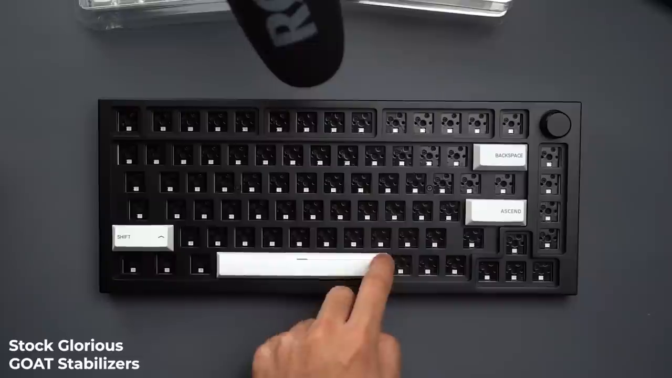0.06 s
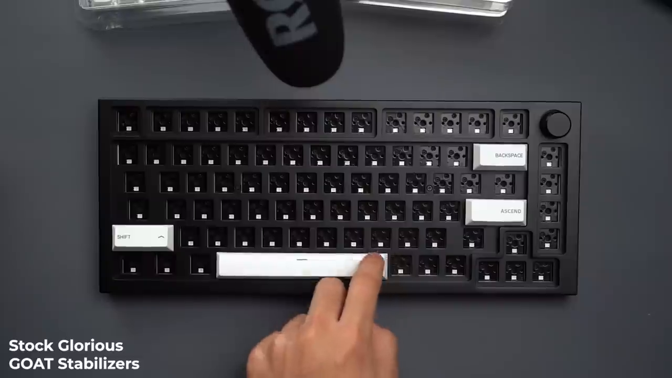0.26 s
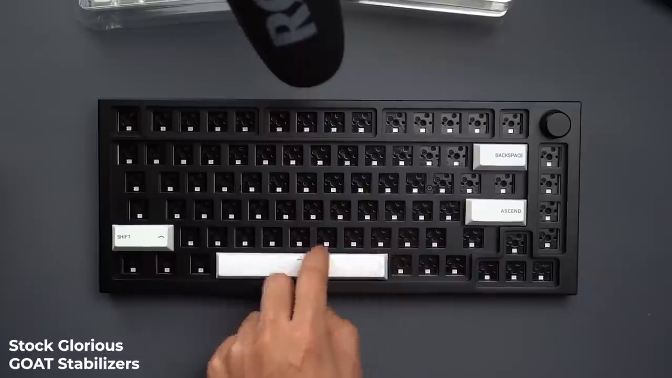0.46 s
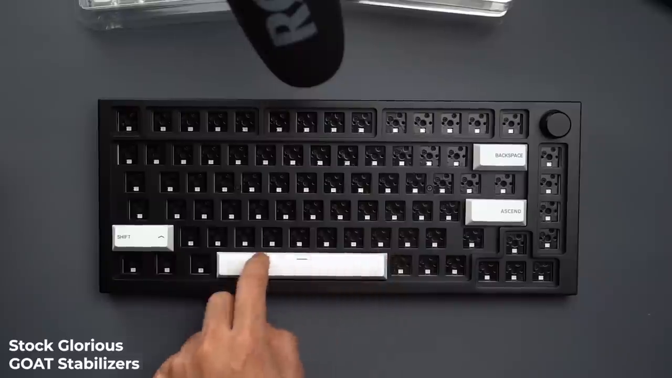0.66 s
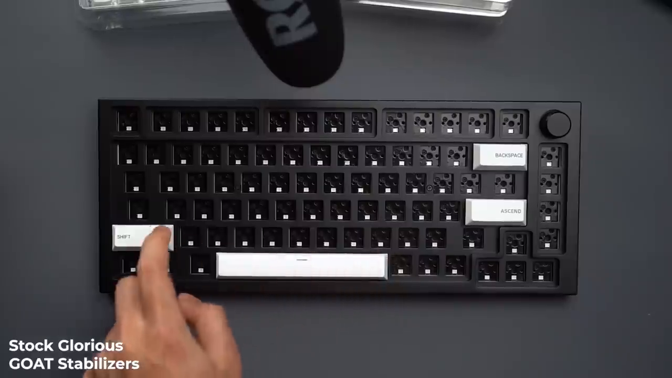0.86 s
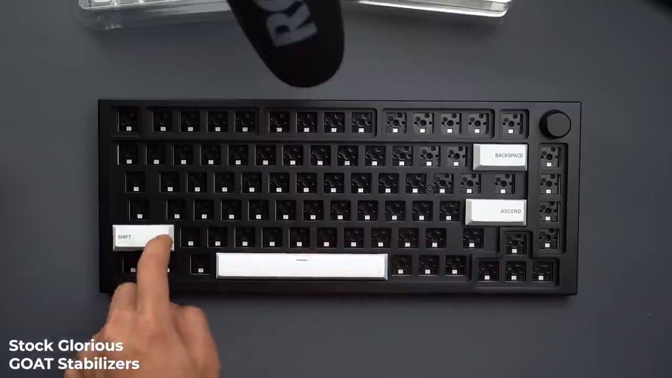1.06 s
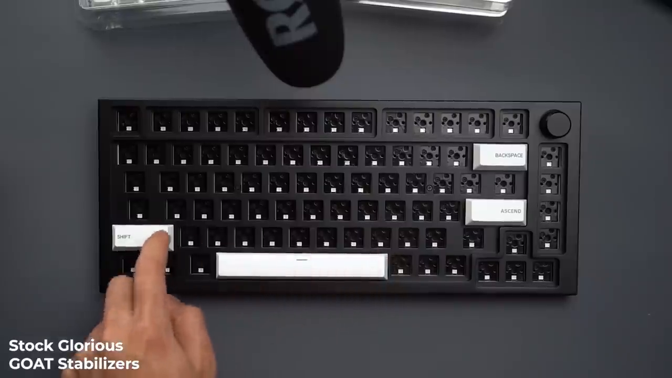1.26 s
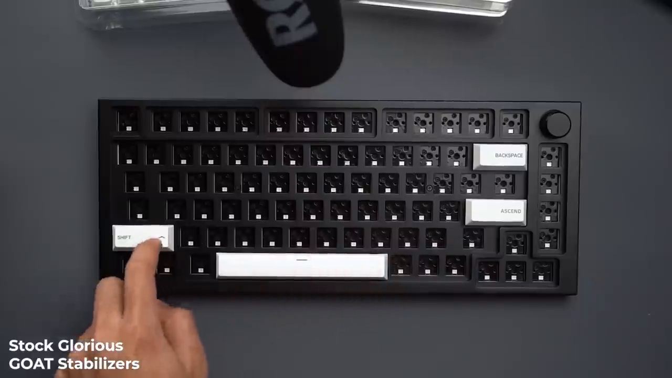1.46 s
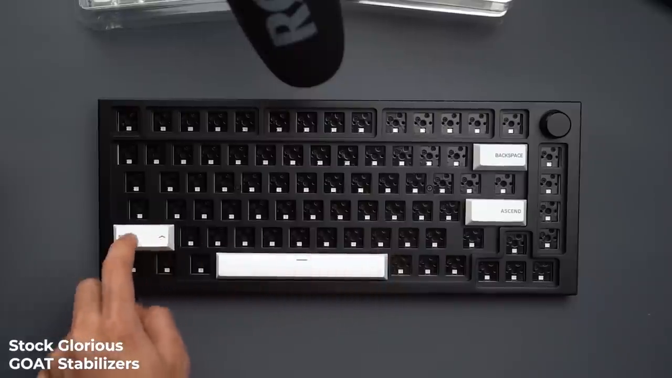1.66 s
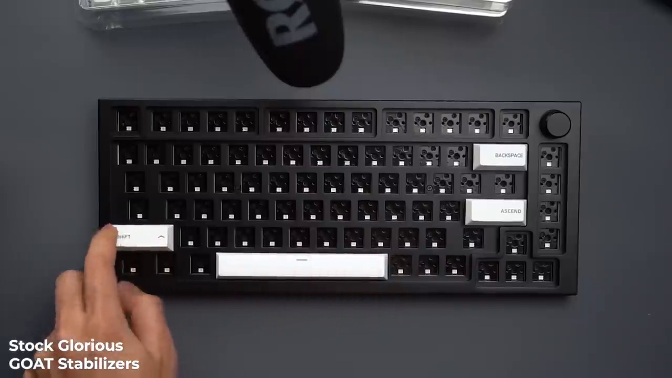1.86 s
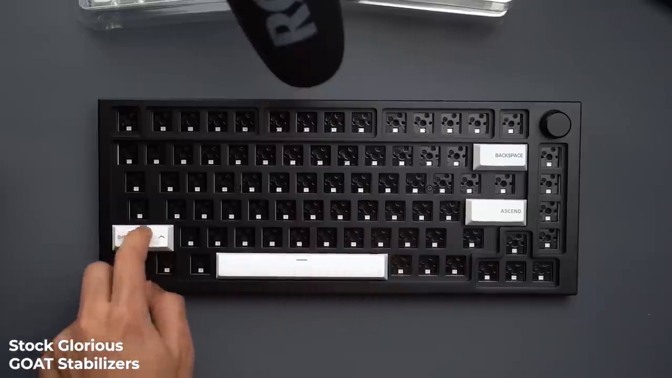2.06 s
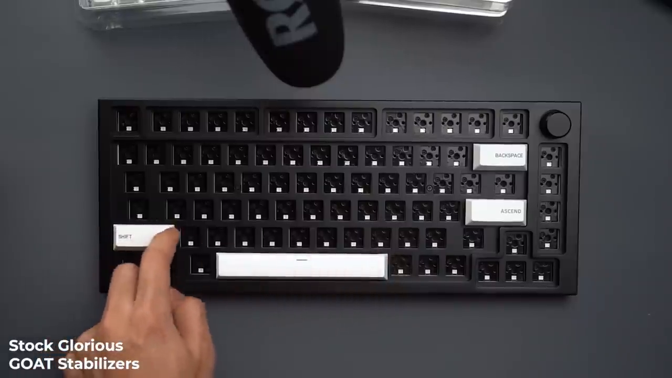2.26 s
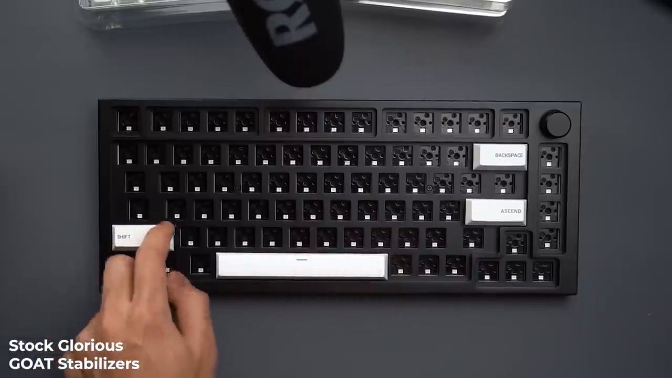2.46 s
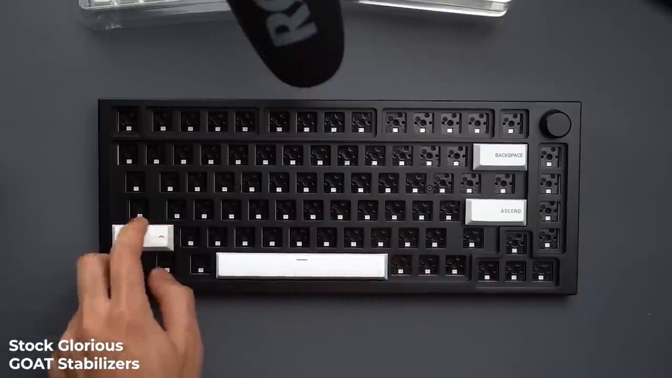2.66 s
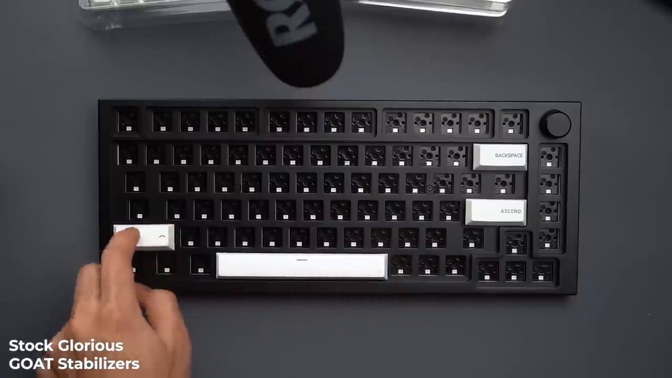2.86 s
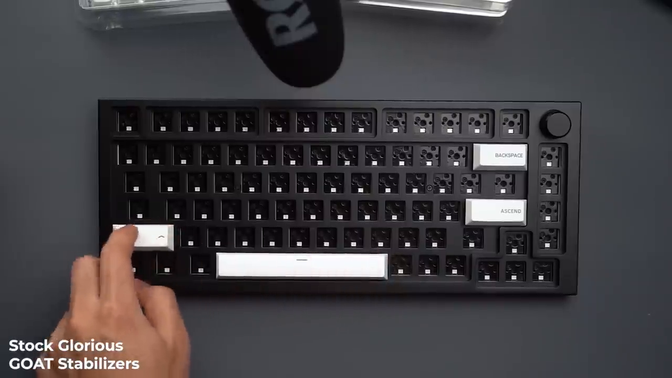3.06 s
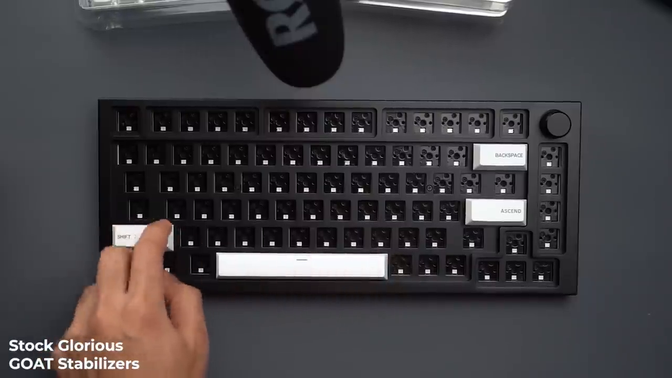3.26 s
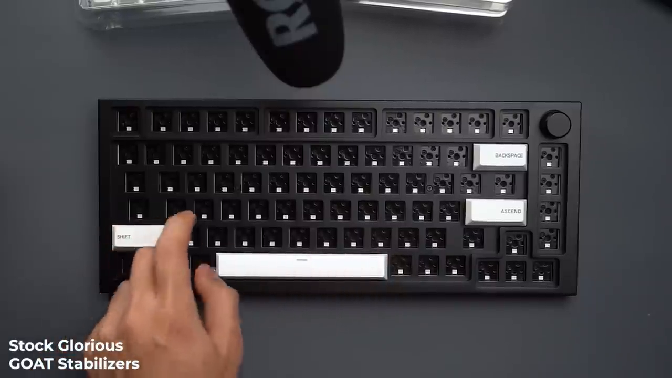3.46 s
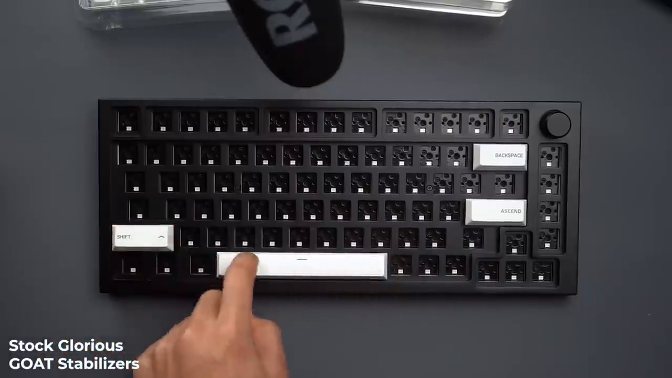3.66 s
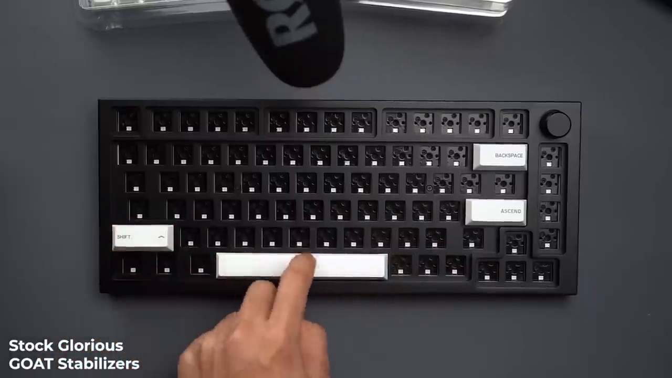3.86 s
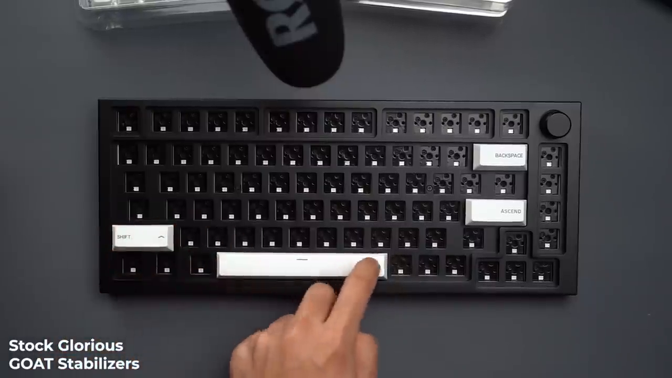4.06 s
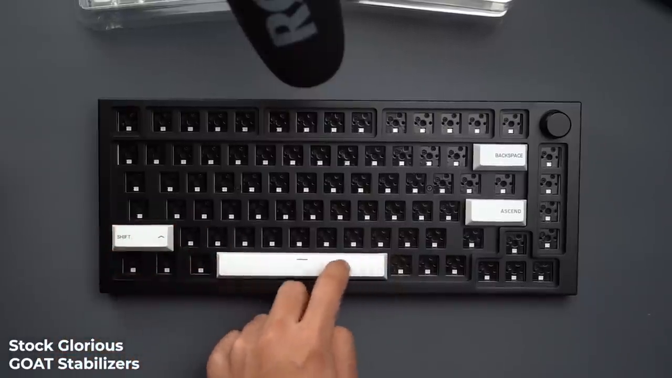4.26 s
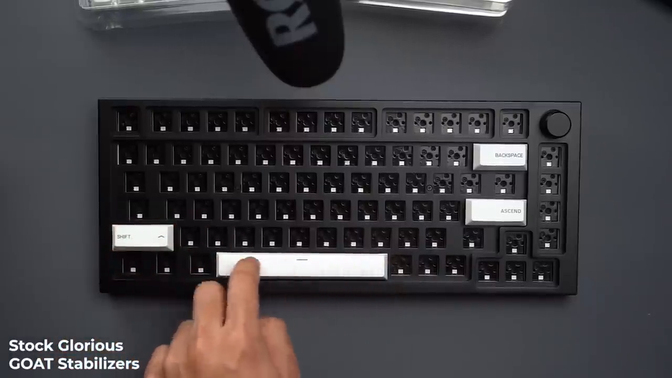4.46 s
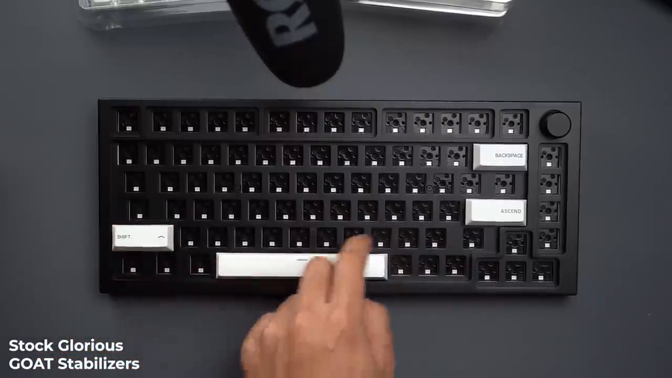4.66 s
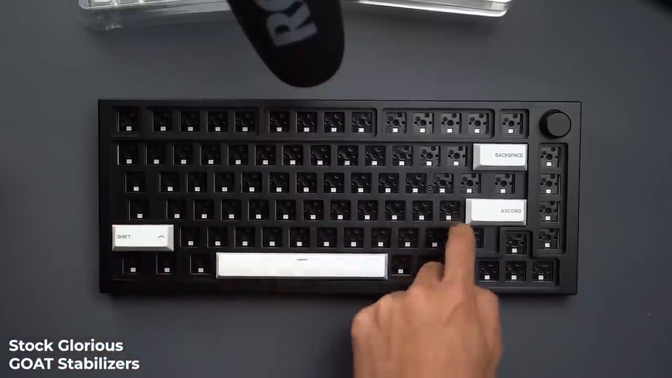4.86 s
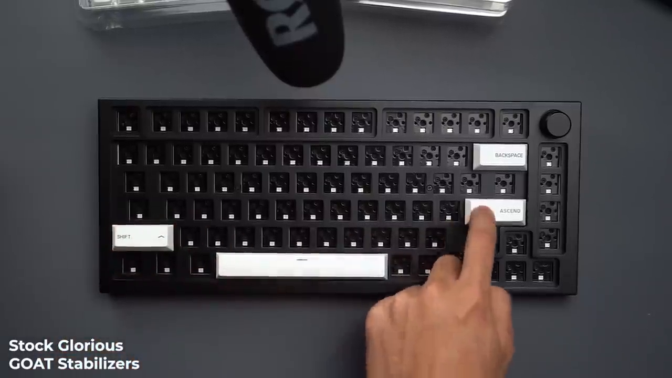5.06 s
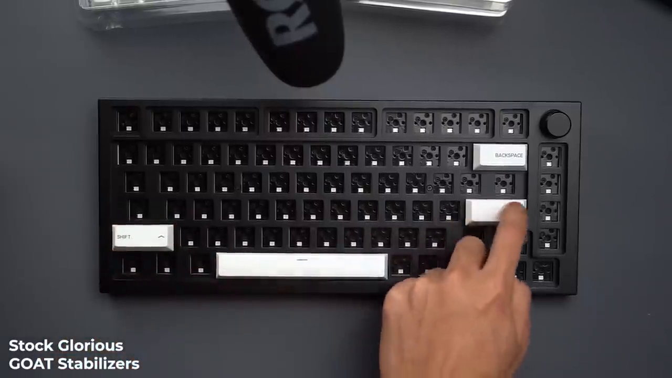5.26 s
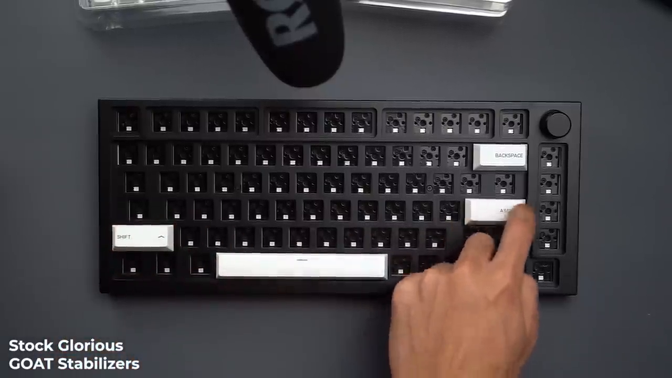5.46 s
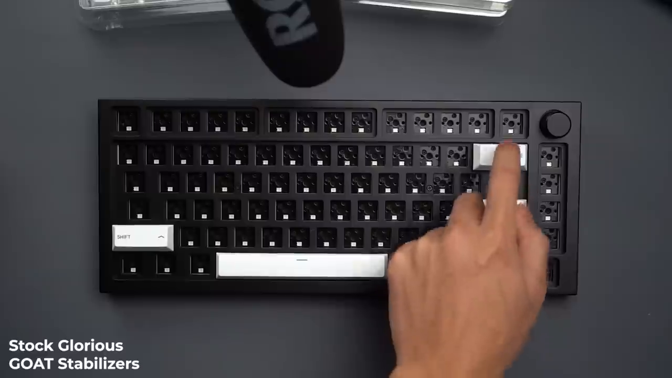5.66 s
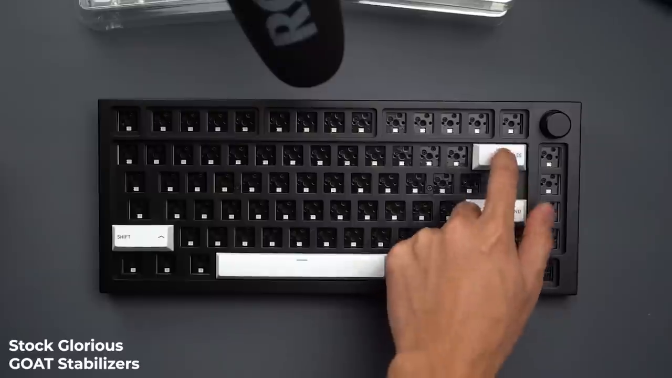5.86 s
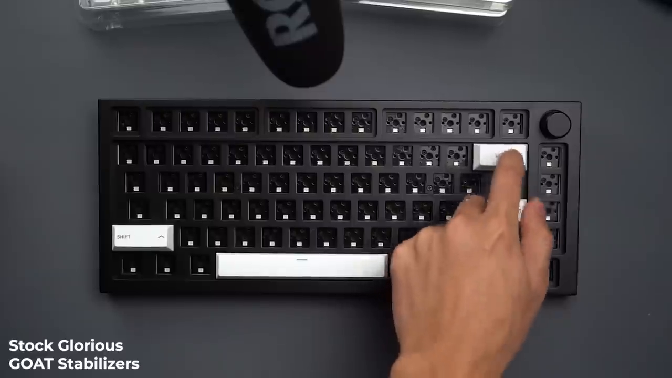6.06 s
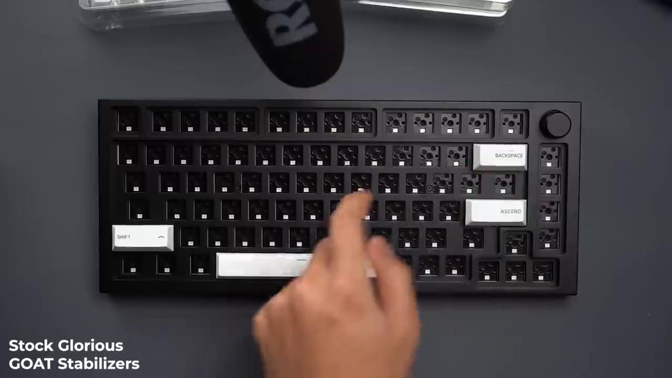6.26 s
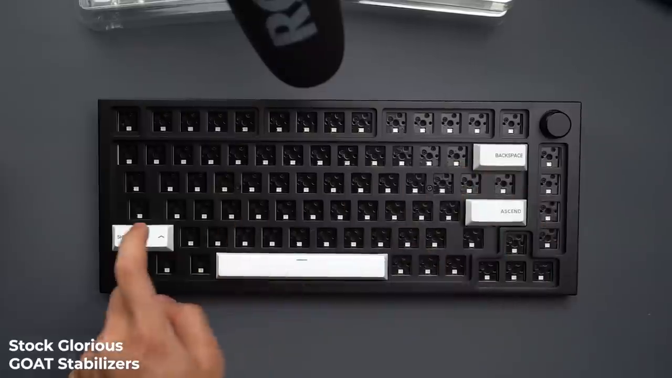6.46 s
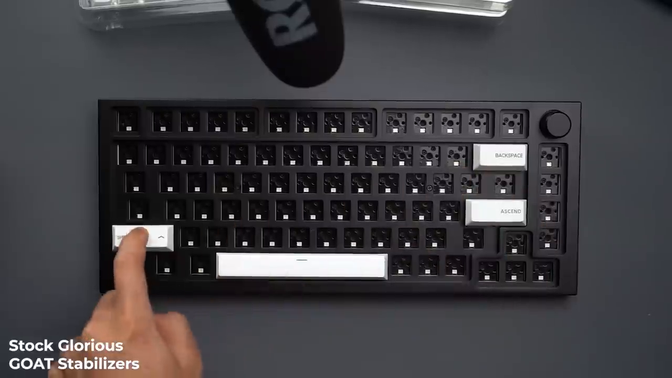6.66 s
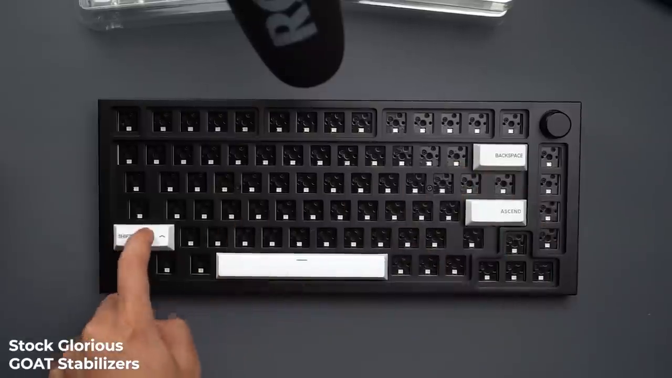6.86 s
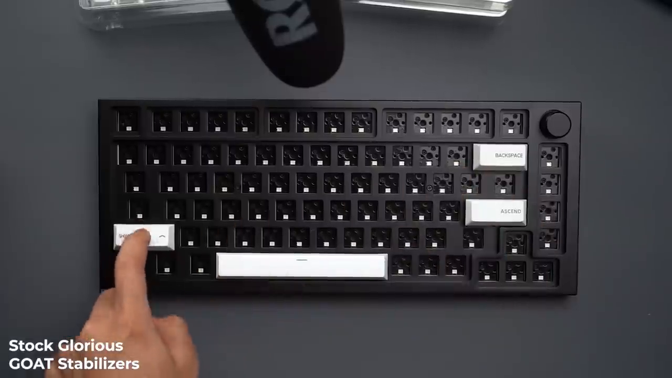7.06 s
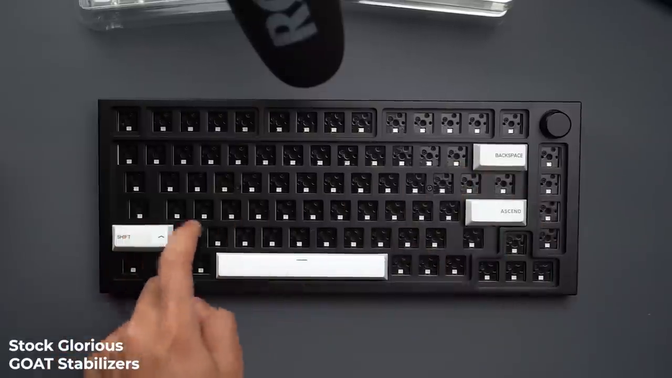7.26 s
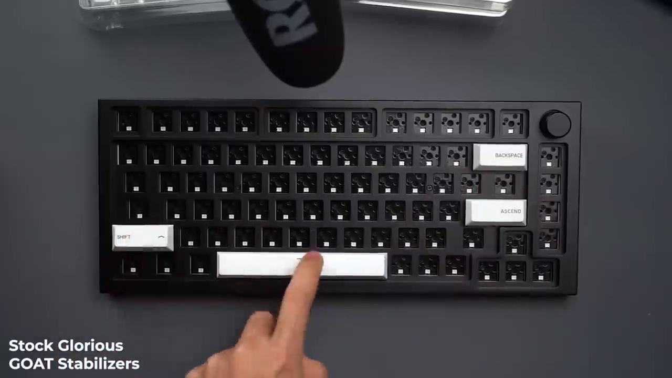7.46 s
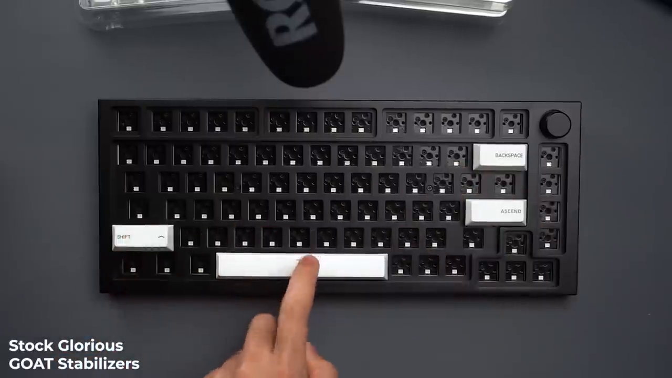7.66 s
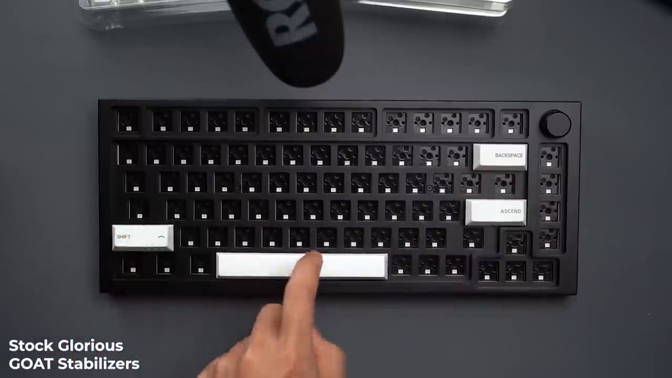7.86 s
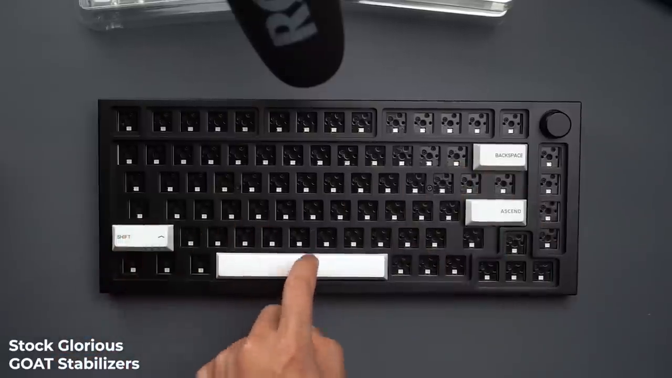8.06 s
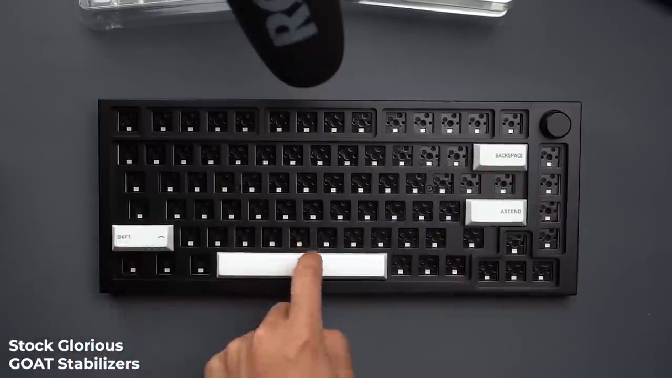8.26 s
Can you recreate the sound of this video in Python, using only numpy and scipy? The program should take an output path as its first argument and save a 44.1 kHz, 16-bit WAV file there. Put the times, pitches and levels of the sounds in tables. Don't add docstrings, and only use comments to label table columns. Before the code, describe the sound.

A finger taps the large keys of a mechanical keyboard, heard very close in a small quiet room. Five space-bar clacks, then a fast even drumming on a left key with down and up clicks, seven more bar strokes, scattered right-key clacks, three hard left-key blows and four loud spaced bar hits. Slight wire rattle, soft desk thuds and a faint fan hum.

```python
import sys
import numpy as np
from scipy import signal
from scipy.fft import rfft, irfft, next_fast_len
from scipy.io import wavfile
from scipy.ndimage import uniform_filter1d

SR = 44100
rng = np.random.default_rng(int(sys.argv[2]) if len(sys.argv) > 2 else 0)


def attenuation_scalar(level_db):
    decades = np.asarray(level_db, float) / 20
    return 10 ** decades


def pcm_store(signal):
    levels = np.round(np.clip(np.atleast_2d(signal), -1, 1) * 32767)
    wavfile.write(sys.argv[1], SR, levels.astype(np.int16).T)


N = 366030
BLOW = 4400
CUTOFF_HZ = 16300

# (time [s], case peak [dB], plate peak [dB], crack peak [dB])
BAR_BOTTOMS = [(0.1184, -18, -12, -15.5), (.28, -17.5, -11.5, -15), (0.4246, -15, -10, -14.5),
               (0.5787, -13.5, -8.5, -15.5), (0.7147, -14.5, -1, -15), (3.6988, -20, -16.5, -27),
               (3.833, -17.5, -2.5, -19.5), (3.9808, -16, -17.5, -19), (4.1302, -18, -11, -18),
               (4.279, -16.5, -10.5, -16), (4.4245, -17, -1.5, -22.5), (4.564, -18, -7, -17.5),
               (7.5268, -12, -4.5, -14), (7.765, -12, 0.5, -9), (8.0234, -11.5, 2.6, -4.5),
               (8.2734, -8.5, 1.5, -7.5)]
# (time [s], case [dB], plate [dB], crack [dB], thud on letting go [dB])
LEFT_BOTTOMS = [(1.0828, -21, -9.5, -39, -33), (1.246, -28, -20, -47, -41),
                (1.3923, -24, -15.5, -32, -26.5), (1.5461, -19, -10.5, -23, -29.5),
                (1.7023, -26.5, -19, -22, -26), (1.847, -23, -15.5, -16.5, -26.5),
                (1.9943, -20.5, -10.5, -13, -36), (2.1496, -19, -14, -17, -61),
                (2.2959, -23.5, -9, -27, -27), (2.458, -22.5, -12, -39, -26.5),
                (2.6133, -20.5, -8, -23, -31.5), (2.771, -14, -10.5, -16.5, -27.5),
                (2.9221, -23, -9.5, -16, -28.5), (3.074, -20, -5, -11, -34.5),
                (3.2224, -21.5, -7.5, -37, -37), (3.3776, -24, -11, -42, -27)]
# (time [s], case peak [dB], plate peak [dB])
LEFT_RETURNS = [(1.144, -12, -8.5), (1.3046, -15.5, -16.5), (1.456, -16.5, -18), (1.6095, -14.5, -11.5),
                (1.7597, -16, -16), (1.9073, -16, -13), (2.059, -17, -15), (2.205, -17, -18.5),
                (2.3621, -18.5, -19.5), (2.519, -15.5, -18.5), (2.6774, -15.5, -16), (2.8339, -15, -15.5),
                (2.9846, -14.5, -14.5), (3.1438, -17.5, -18), (3.2979, -18, -17.5), (3.4426, -15, -15.5),
                (6.7273, -14, -10.5), (6.9705, -9.5, -4), (7.2274, -11, -4)]
# (time [s], case peak [dB], plate peak [dB], crack peak [dB])
FULL_CLACKS = [(4.8976, -22.5, -22, -25.5), (5.0646, -19.5, -18.5, -22), (5.1448, -16, -16, -22.5),
               (5.2283, -18, -18.5, -17.5), (5.298, -18, -19.5, -27.5), (5.4357, -15, -18, -23),
               (5.5786, -15, -17.5, -20), (5.78, -15, -11.5, -14), (5.9189, -22.5, -14, -17),
               (6.0487, -12, -7.5, -11), (6.6458, -9.5, -3, -3), (6.8822, -13, -1, -3.5),
               (7.1269, -11, 0, 0)]


def rms_one(x):
    return x / np.sqrt(np.mean(x ** 2) + 1e-20)


def at_hz(points, hz, column=1):
    points = np.array(points)
    return np.interp(np.log(np.maximum(hz, 1)), np.log(points[:, 0]), points[:, column])


def coloured(white, spectrum):
    size = next_fast_len(N)
    gain = attenuation_scalar(at_hz(spectrum, np.fft.rfftfreq(size, 1 / SR)))
    return rms_one(irfft(rfft(white, size) * gain, size)[:N])


def ring(push, hz, t60):
    radius = attenuation_scalar(-60 / (t60 * SR))
    angle = 2 * np.pi * hz / SR
    return signal.lfilter([0, np.sin(angle)], [1, -2 * radius * np.cos(angle), radius * radius], push + 1e-18)


def band(x, low_hz, high_hz):
    return signal.sosfilt(signal.butter(2, [low_hz, high_hz], "band", fs=SR, output="sos"), x)


def lay(times, shapes):
    out = np.zeros(N + shapes.shape[1])
    starts = np.round(times * SR).astype(int)
    np.add.at(out, starts[:, None] + np.arange(shapes.shape[1]), shapes)
    return out[:N]


def fan_hum():
    # (frequency [Hz], density [dB per Hz])
    hum_spectrum = [(33, -25), (50, -5), (80, -11), (125, -2.5), (170, -1.5), (215, -0.5), (275, 4.5),
                    (320, -7), (500, -11), (1000, -17), (2500, -31), (3500, -31.5), (5500, -46),
                    (16400, -49)]
    return attenuation_scalar(-46.5) * coloured(rng.standard_normal(N), hum_spectrum)


def slides():
    # (time [s], length [s], level at start [dB], level at end [dB])
    long_rubs = [(0.0, 0.047, -53.5, -66), (.165, 0.036, -68, -67), (.3, 0.041, -64, -60),
                 (.455, 0.044, -56, -62.5), (.601, 0.052, -54, -64), (.746, 0.049, -55, -63),
                 (3.7, 0.0045, -34, -60), (3.793, 0.052, -69, -53), (3.835, 0.083, -50, -61.5),
                 (3.983, 0.081, -60, -62.5), (4.318, 0.058, -56, -63), (4.392, 0.036, -65, -52),
                 (4.454, 0.095, -57, -67), (4.61, 0.048, -57, -61.5), (4.883, 0.011, -55.5, -42),
                 (4.927, 0.043, -62, -49), (5.208, 0.013, -58, -64), (6.634, 0.016, -79, -55),
                 (7.603, 0.019, -51.5, -66.5), (7.854, 0.015, -55.5, -55), (8.114, 0.016, -64.5, -60)]
    # (length [s], level at start [dB], level at end [dB])
    kinds = [(BAR_BOTTOMS, (0.012, -69.5, -51.5)),
             (LEFT_BOTTOMS, (0.012, -54, -69.5)),
             (LEFT_RETURNS, (0.02, -71.5, -70.5)),
             (FULL_CLACKS, (0.0087, -60.5, -70))]
    travels = [(row[0] - travel[0], *travel) for rows, travel in kinds for row in rows]
    return travels + list(long_rubs)


def scrape():
    # (frequency [Hz], density [dB per Hz])
    scrape_colour = [(1200, 4), (3000, 2.5), (4800, -5.5), (5600, -2.5), (6800, -10.5), (8000, -8.5),
                     (8600, -6), (9600, -11.5), (11500, -5.5), (12800, -12), (14800, -8.5), (16200, -4.5)]
    t = np.arange(N) / SR
    grains = rng.standard_normal(N) * attenuation_scalar(1.5 * rng.exponential(1, N))
    grip_db = 1.2 * rms_one(uniform_filter1d(rng.standard_normal(N), size=300))
    level = np.zeros(N)
    for s, length, start_db, end_db in slides():
        inside = slice(int(s * SR), int((s + length) * SR))
        level[inside] = attenuation_scalar(np.interp(t[inside], [s, s + length], [start_db, end_db]))
    return attenuation_scalar(9.5 + grip_db) * uniform_filter1d(level, size=220) * coloured(grains, scrape_colour)


def room(x):
    # (frequency [Hz], t60 [s], level [dB])
    tail_bands = [(150, 0.14, -47.5), (530, 0.32, -12.5), (820, .3, -28), (1610, 0.35, -29.5),
                  (2800, 0.31, -31.5), (4100, 0.28, -29), (6960, 0.33, -42), (12000, 0.28, -41.5),
                  (15160, .2, -41)]
    # (frequency [Hz], level [dB])
    early_bands = [(500, -20), (1000, -10.5), (2400, -12), (4200, -11.5), (14000, -12.5)]
    # (frequency [Hz], share [0-1])
    blurred = [(700, .15), (1700, 0.4), (3000, 0.6)]
    early_s, early_t60_s = 0.0038, 0.0083
    t = np.arange(SR // 2) / SR
    paths = rng.standard_normal((2, len(t)))
    white = rng.standard_normal((2, N))
    early = attenuation_scalar(-60 * np.abs(t - early_s) / early_t60_s) * np.clip(t / early_s, 0, 1) ** 2
    edges = 60 * 2 ** np.arange(0, 8.1, .5)
    echo, tail = 0, 0
    for k, (low, high) in enumerate(zip(edges, edges[1:])):
        hz = np.sqrt(low * high)
        below, above = low / 1.2, high * 1.2
        t60 = at_hz(tail_bands, hz)
        gain = attenuation_scalar(at_hz(tail_bands, hz, column=2))
        share = np.clip(at_hz(blurred, hz), 0, 1)
        echo = echo + attenuation_scalar(at_hz(early_bands, hz)) * early * band(paths[k % 2, ::-1], low, high)
        echo = echo + gain * np.sqrt(1 - share) * attenuation_scalar(-60 * t / t60) * band(paths[k % 2], low, high)
        power = signal.lfilter([share], [1, -attenuation_scalar(-120 / (t60 * SR))], band(x, below, above) ** 2)
        tail = tail + gain * np.sqrt(power * SR / 2 / (above - below)) * band(white[k % 2], low, high)
    return attenuation_scalar(-18.5) * (signal.fftconvolve(x, echo)[:N] + tail)


def on_bar(times):
    # (start [s], end [s])
    bar_periods = [
        (0, .9),
        (3.6, 4.7),
        (7.4, 8.4),
    ]
    return np.any([(times >= a) & (times < b) for a, b in bar_periods], axis=0)


def contacts(rows, cap_db, crack_db=0.0):
    s, case_db, plate_db, *own = np.transpose(rows)
    crack = own[0] if own else plate_db + crack_db
    return np.array([s, case_db, (case_db + plate_db) / 2 + cap_db, plate_db, crack])


def all_contacts():
    # (time [s], case peak [dB], plate peak [dB])
    bar_returns = [(.0437, -43, -40), (.1982, -45, -41), (.3466, -33.5, -22), (.497, -32, -25),
                   (.734, -46, -40), (.789, -31.5, -34), (3.7184, -34, -18), (4.6572, -42, -41),
                   (7.6104, -23, -28.5), (7.8623, -25, -34.5), (8.1296, -30.5, -25.5)]
    # (time [s], case peak [dB], plate peak [dB])
    bar_touches = [(.098, -33, -17.5), (.2587, -37.5, -16.5), (.4058, -35.5, -16.5), (.6947, -36.5, -27.5),
                   (3.958, -42, -25), (4.106, -42, -19.5), (4.2577, -39, -20.5), (7.518, -31.5, -13.5),
                   (7.754, -52.5, -47.5), (8.0144, -45, -28), (8.265, -34, -21)]
    # (time [s], case peak [dB], plate peak [dB])
    key_touches = [(1.0719, -42, -10.5), (1.227, -61, -12.5), (1.374, -43, -11), (1.531, -44, -22),
                   (1.6846, -41, -20), (1.828, -37, -21.5), (1.9786, -40, -22.5), (2.1796, -55, -24.5),
                   (2.2787, -39, -15.5), (2.441, -40, -18.5), (2.6, -47, -12), (2.7614, -51, -31),
                   (2.9066, -31, -21.5), (3.059, -34, -20.5), (3.2037, -63, -39), (3.3567, -53, -17),
                   (4.8856, -35, -34), (5.0388, -51, -25), (5.7712, -44, -30), (6.039, -55, -34),
                   (6.1055, -53.5, -31), (6.6405, -25, -17), (6.8766, -37, -27), (7.1216, -36, -23),
                   (7.2153, -65, -27)]
    # (time [s], case peak [dB], plate peak [dB])
    light_ticks = [(4.9074, -33, -36), (4.936, -41, -39), (5.3571, -28, -28.5), (5.504, -30, -25),
                   (5.5227, -30, -30), (5.8443, -22.5, -30.5), (5.9844, -20.5, -19), (6.122, -20, -14.5),
                   (6.204, -35, -36)]
    return np.hstack([contacts(BAR_BOTTOMS, cap_db=-2.6),
                      contacts(bar_returns, cap_db=3.0, crack_db=-18.5),
                      contacts(bar_touches, cap_db=1.5, crack_db=-6.0),
                      contacts(LEFT_BOTTOMS, cap_db=0.4),
                      contacts(LEFT_RETURNS, cap_db=-1.0, crack_db=-4.5),
                      contacts(key_touches, cap_db=-1.0, crack_db=-3.0),
                      contacts(FULL_CLACKS, cap_db=3.5),
                      contacts(light_ticks, cap_db=-6.0, crack_db=-1.0)])


def chatter(times, case_db, plate_db, touch_ms, clack_ms, hard_ms):
    t_ms = np.arange(BLOW) / SR * 1000
    clack_soon = np.array([np.any((times > s) & (times < s + .027)) for s in times])
    touch = clack_soon & (case_db < -18.8)
    length = np.where(touch, touch_ms, np.where(plate_db > -9.5, hard_ms, clack_ms))[:, None]
    envelope = np.exp(-t_ms / length) * (1 - np.exp(-2 * t_ms / length)) ** 2
    force = rng.standard_normal((len(times), BLOW)) * envelope
    return force / np.linalg.norm(force, axis=1, keepdims=True)


def body(modes, times, force, peak_db):
    scatter_db = 2.2 * np.clip(rng.standard_normal((len(times), len(modes))), -3, 1.2)
    hard = np.clip(peak_db + 6, 0, 9)
    out = 0
    for k, (hz, t60, bar_db, key_db) in enumerate(modes):
        own = np.abs(force @ np.exp(2j * np.pi * hz / SR * np.arange(BLOW)))
        octaves = np.log2(hz / modes[2][0])
        mode_db = np.where(on_bar(times), bar_db - 4.8 * hard * abs(octaves), key_db + 2 * hard * octaves)
        gain = attenuation_scalar(mode_db + scatter_db[:, k]) / np.maximum(own, .3)
        out = out + ring(gain[:, None] * force, hz, t60)
    return out


def crowd(bands, force):
    out = 0
    for low_hz, high_hz, t60, db in bands:
        power = signal.lfilter([1], [1, -attenuation_scalar(-120 / (t60 * SR))], force ** 2 + 1e-18)
        noise = band(np.sqrt(power) * rng.standard_normal(force.shape), low_hz, high_hz)
        out = out + attenuation_scalar(db) * noise * np.sqrt(SR / 2 / (high_hz - low_hz))
    return out


def favour(times, blows):
    # (time [s], hollow [dB], cap [dB], stem [dB], snap [dB])
    tints_drummed = [(1.072, 4, 10.5, 4.5, 1.5), (1.083, 5, -2, -11, 4), (1.144, 0, 1, -0.5, 5.5),
                     (1.227, -4.0, 4, 3, 5.5), (1.246, 8, -1, -9, 5), (1.305, 6, -7, 8, -10),
                     (1.374, 1.0, 13, 3, 7), (1.392, 4, 0, -1, 4), (1.456, 7.5, -7.0, 7, -9.0),
                     (1.546, 4.5, -2, 3, 6), (1.609, 6.5, -2, 3, -2), (1.702, 7.5, -3, 10, 2),
                     (1.76, 3.5, -7, -1, -4), (1.847, 0.0, 0, 9, -1.5), (1.907, 4.5, -3.5, 3, -2),
                     (1.994, -1, 0.5, 9, 3.5), (2.059, 9, -12, -3, -8.0), (2.15, 4.5, 0, 3, -2),
                     (2.205, 2, -7, 8, -9.0), (2.279, -8.0, 11, 0, 4), (2.296, 5, 2.5, 0.5, -3.0),
                     (2.362, 7, -2, 7.5, -8.0), (2.441, -3.0, 9, 1, 1), (2.458, 0.0, 0, -2, 11),
                     (2.519, -1, 7, 7, -5), (2.6, 0.0, 7, 1, 2), (2.613, 3.5, -1, 0, 1),
                     (2.677, 4, -6, 7, -8), (2.771, 0.5, 2.5, 7, 1), (2.834, 6, -4.5, 2, -5.5),
                     (2.907, -5, 0, 0.0, -10), (2.922, -7.5, 0.5, 6, -7.5), (2.985, 4.5, -1, 1.5, -8),
                     (3.059, -9, 4, 0.5, -5), (3.074, 0, 3, 2, 0), (3.144, 6.5, -0.5, 2, -6),
                     (3.223, 6, -3, -1, 10.5), (3.298, 3, -7, 3.5, -2.0), (3.378, 7, 1.5, -3, 11),
                     (3.443, 1.5, -10, 6, -9)]
    # (time [s], hollow [dB], cap [dB], stem [dB], snap [dB])
    tints_single = [(0.118, 7, 1, -4, -1), (0.28, 4.5, 3, 2.5, -1), (0.424, 3, 1, -3, -7.0),
                    (0.579, -1.5, -0.5, -8, 0), (0.715, 3, 1, -1.5, 7.5), (3.699, -10.0, -12, -14, 7),
                    (3.833, 5, 2.5, -1, 6), (3.981, 3.5, -1, 10, 2.5), (4.13, 6.5, -3, 3.5, -1),
                    (4.279, 4.5, -9, -0.5, -3), (4.425, 2, 1.5, 0.5, 11.5), (4.564, 4, 6, -7, 3),
                    (4.898, 4, -4, 2, 1), (5.065, -7, -13, -1, -10.0), (5.145, 3.5, -14, -1.5, 3),
                    (5.228, 1, -2, -7, -2), (5.298, 4, -1.5, -8, 4), (5.436, -3, -9, -5, 5.5),
                    (5.579, 1.5, -7, -2, -3.0), (5.78, 2, -2.5, 0, -1.5), (5.844, -3, -2, 6, 14.5),
                    (5.919, 1.5, 1.5, -1.5, -2), (5.984, 7.5, 9, -6, 4), (6.049, -19, -0.5, 4, -3),
                    (6.122, 1, 1, -3, 7.5), (6.646, 2, 2, 4.5, 3.5), (6.727, 3.0, -11, 0.5, 3),
                    (6.882, 4, -1.5, 5.5, 4), (6.971, 1, -4.5, 4, 5), (7.127, 4, 2, 8, 4.5),
                    (7.227, 6, -9, 0.5, 5), (7.527, -7, -9, -1, 2.5), (7.765, 1.5, -3, 1, 5),
                    (8.024, 3, 2, -0.5, 8), (8.274, -0.5, -1.0, 0.5, 7)]
    # (time [s], hollow [dB], cap [dB], stem [dB], snap [dB])
    tints_light = [(.098, 0.1, -2, -2, 8), (.259, 4, -1, -2, 8), (.347, 9.5, 4, 1, 1),
                   (.406, -3, 2, .1, 10), (.497, 5, 6, -3, -2), (5.771, .1, -1, -1, -3),
                   (6.106, -2.5, .1, 3, -2), (6.204, -0.5, 2, 5, -12), (7.215, 1, 0.5, 0, -4),
                   (7.518, 1.5, .1, .1, 7.5), (7.61, 2.5, -2, 1.5, .1), (7.862, 2, -0.5, 3.5, 3)]
    # (low [Hz], high [Hz])
    tint_ranges = [(550, 850), (1850, 2500), (3500, 5000), (9000, 16000)]
    s, *lift_db = np.transpose(list(tints_drummed) + list(tints_single) + list(tints_light))
    which = np.abs(times - s[:, None]).argmin(axis=1)
    out = blows.copy()
    for (low_hz, high_hz), db in zip(tint_ranges, lift_db):
        out[which] += (attenuation_scalar(db) - 1)[:, None] * band(blows[which], low_hz, high_hz)
    return out


def keys():
    # (frequency [Hz], t60 [s], long bar [dB], short key [dB])
    case_modes = [(642, 0.089, -23, -23), (705, 0.03, -13, -29), (1042.4, 0.021, -5.5, -15),
                  (1235, 0.045, -7, -15.5), (1277, 0.04, -16.5, -6), (1382, 0.032, -16, -14.5)]
    cap_modes = [(1533, 0.051, -39.5, -12.5), (1701, .034, -10.5, -18), (1956, 0.028, -24, -13),
                 (2120, 0.028, -20.5, -11.5), (2220, 0.017, -32, -8.5)]
    plate_modes = [(2862, 0.028, -16, -5), (2958, 0.017, 10, 5.5), (3172, 0.036, 3.5, -11.5),
                   (3960, 0.0059, -15, 2), (4086, 0.011, -14.5, -13.5), (3425, 0.0047, 16.5, -21),
                   (3876, 0.00033, -19.5, 5.5)]
    spring_modes = [(5500, 0.026, -14, -44), (5700, 0.0077, -72.5, -61), (7240, 0.02, -28, -45),
                    (7750, 0.026, -44, -36)]
    # (low [Hz], high [Hz], t60 [s], level [dB])
    case_crowd = [(500, 1050, .022, -21), (1050, 1500, .02, -14)]
    cap_crowd = [(1500, 2000, .019, -11), (2000, 2600, .018, -9)]
    plate_crowd = [(2750, 3656, 0.022, 1.5), (3500, 18000, 0.029, -23.5)]
    crack_crowd = [(4440, 6030, 0.011, -3), (6000, 8400, 0.0077, -10), (9100, 11930, 0.0059, -12),
                   (13100, 20000, 0.0077, -12.5)]
    # (low [Hz], high [Hz])
    part_ranges = [(500, 1600), (1400, 2700), (2400, 5400), (4800, 17000)]
    times, *peak_db = all_contacts()
    force = chatter(times, peak_db[0], peak_db[2], touch_ms=1.33, clack_ms=0.29, hard_ms=0.15)
    parts = zip([case_modes, cap_modes, plate_modes, spring_modes],
                [case_crowd, cap_crowd, plate_crowd, crack_crowd],
                part_ranges, peak_db, [0.02, 0.13, -1.83, -2.07])
    blows = 0
    for modes, bands, (low_hz, high_hz), db, trim_db in parts:
        part = band(body(modes, times, force, db) + crowd(bands, force), low_hz, high_hz)
        blows = blows + attenuation_scalar(db + trim_db)[:, None] * part / np.abs(part).max(axis=1, keepdims=True)
    return lay(times, favour(times, blows) * np.cos(np.linspace(0, np.pi / 2, BLOW)))


def thuds():
    # (time [s], peak [dB], frequency of the push [Hz])
    single_thuds = [(4.627, -27.5, 150), (4.902, -21, 145), (5.066, -31, 119), (5.147, -39.5, 150),
                    (5.23, -26, 118), (5.383, -30.5, 108), (5.523, -27.5, 113), (5.58, -27, 176),
                    (5.78, -22.5, 132), (5.919, -24.5, 137), (6.048, -21, 126), (6.123, -30, 150),
                    (6.647, -24.5, 102.3), (6.673, -25, 79.4), (6.884, -26, 111), (6.973, -30.5, 126),
                    (7.122, -29.5, 150), (7.144, -25.5, 101), (6.66, -30, 52.4), (6.9, -33, 52.8),
                    (7.14, -35, 51.6)]
    bar = [(s, db - 6, 121 + 3.5 * (db + 15.0)) for s, db, *_ in BAR_BOTTOMS]
    bounce_s = 0.0245
    bounce = [(s + bounce_s, db - 21, hz) for s, db, hz in bar if s + bounce_s < N / SR]
    left = [(s, -33 + 0.17 * (db + 29.0), 103.2) for s, db, *_ in LEFT_BOTTOMS]
    let_go = [(s + 0.03703, db, 160) for s, *_, db in LEFT_BOTTOMS]
    return [(s + 0.0011, db, hz) for s, db, hz in bar + left] + bounce + let_go + list(single_thuds)


def desk():
    # (frequency [Hz], t60 [s], long bar [dB], short key [dB])
    desk_modes = [(62, 0.24, -46.5, -44.5), (88.8, 0.13, -52, -41.5), (139, 0.15, -48.5, -44.5),
                  (171.9, 0.17, -42, -37)]
    # (frequency [Hz], t60 [s], level [dB])
    hollow_modes = [(374.5, 0.086, -10.5), (431, 0.044, -4.5)]
    # (start [s], end [s])
    right_period = (4.95, 6.3)
    right_levels = [-22, -9, -1, -4]
    times, peak_db, hz = np.transpose(thuds())
    starts = times - .002
    turns = np.arange(1500) / SR * hz[:, None]
    window = np.sin(np.pi * np.clip(turns / 1.293, 0, 1)) ** 0.26
    swing = attenuation_scalar(peak_db - 8.0)[:, None] * np.sin(2 * np.pi * turns) * window
    out = lay(starts, swing)
    right = (times > right_period[0]) & (times < right_period[1])
    for (mode_hz, t60, bar_db, key_db), less_db in zip(desk_modes, right_levels):
        gain = attenuation_scalar(np.where(on_bar(times), bar_db, key_db + less_db * right))
        out += ring(lay(starts, gain[:, None] * swing), mode_hz, t60)
    knocks = lay(starts, (attenuation_scalar(peak_db) * on_bar(times))[:, None])
    hollow = sum(attenuation_scalar(db) * ring(knocks, mode_hz, t60) for mode_hz, t60, db in hollow_modes)
    return band(out + hollow, 47, 400)


def swelling_modes(rows, rings):
    s, case_db, plate_db, *_ = np.transpose(rows)
    t = np.arange(600) / SR
    out = 0
    for delay, swell, hz, t60, db in rings:
        envelope = np.sin(np.pi * np.clip(t / swell, 0, 1)) ** 2
        push = envelope * np.sin(2 * np.pi * hz * t) * 4 / (swell * SR)
        heard = s + delay < N / SR
        peak_db = plate_db if hz > 2400 else case_db
        out = out + ring(lay(s[heard] + delay, attenuation_scalar(peak_db + db)[heard, None] * push), hz, t60)
    return out


def after_ring():
    # (delay [s], swell [s], frequency [Hz], t60 [s], level under the peak of case or plate [dB])
    bar_rings = [
        (.0005, 0.00035, 3930, 0.0052, -5),
        (.001, .002, 1650, .03, -2),
        (.02, .008, 1660, 0.042, -17),
        (0.019, 0.0048, 1220, .03, -24),
    ]
    # (delay [s], swell [s], frequency [Hz], t60 [s], level under the peak of the case [dB])
    key_rings = [
        (.002, .006, 1278, 0.023, -9.5),
        (.003, .01, 642, .2, -25.5),
    ]
    return swelling_modes(BAR_BOTTOMS, bar_rings) + swelling_modes(LEFT_RETURNS, key_rings)


def wires():
    # (frequency [Hz], ring t60 [s], level under the plate peak [dB], buzz t60 [s])
    wire_modes = [(5600, 0.014, -62, 0.2), (10900, 0.018, -77, 0.16), (7800, 0.0055, -59.5, 0.24)]
    # (start [s], end [s])
    wire_periods = [(1, 4.7), (5.7, 6.3), (7.4, 8.4)]
    times, _, _, plate_db, _ = all_contacts()
    noise = rng.standard_normal((len(times), BLOW))
    t = np.arange(BLOW) / SR
    fade = np.cos(np.linspace(0, np.pi / 2, BLOW))
    out = 0
    for (hz, t60, db, buzz_t60), (start, end) in zip(wire_modes, wire_periods):
        strength = attenuation_scalar(plate_db + db) * (times > start) * (times < end)
        buzz = strength[:, None] * noise * attenuation_scalar(-60 * t / buzz_t60) * fade
        out = out + ring(lay(times, buzz), hz, t60)
    return out


def pings():
    # (time [s], level [dB], frequency [Hz], t60 [s])
    ping_events = [(5.5154, -32, 13500, 0.011), (5.9, -50, 7200, .015), (5.909, -44.5, 13500, 0.011),
                   (5.993, -45.5, 7300, .015), (6.038, -36, 7700, 0.013), (6.038, -41, 10700, 0.014),
                   (6.113, -37, 5200, 0.013), (6.13, -44, 12000, 0.011), (6.205, -48, 3760, 0.32),
                   (7.775, -57, 7850, 0.2), (8.044, -53, 7740, 0.16), (7.842, -50, 12400, .012)]
    t = np.arange(2 * BLOW) / SR
    white = rng.standard_normal((len(ping_events), len(t))) * (1 - np.exp(-t / .001))
    puffs = [attenuation_scalar(db + 10 - 60 * t / t60) * band(noise, hz * .86, min(hz * 1.16, CUTOFF_HZ))
             for noise, (_, db, hz, t60) in zip(white, ping_events)]
    return lay(np.array(ping_events)[:, 0], np.array(puffs))


def scene():
    near = keys() + after_ring() + wires() + scrape() + desk()
    return (near + room(near) + fan_hum() + pings())[None]


def roll_off(x):
    return signal.sosfilt(signal.butter(12, 16470, fs=SR, output="sos"), x)


def record(dry):
    low_pass = signal.cheby2(10, 50, CUTOFF_HZ, fs=SR, output="sos")
    mix = np.clip(signal.sosfilt(low_pass, dry), -1, 1)
    return roll_off(mix)


dry = scene()
out = record(dry)
pcm_store(out)
```